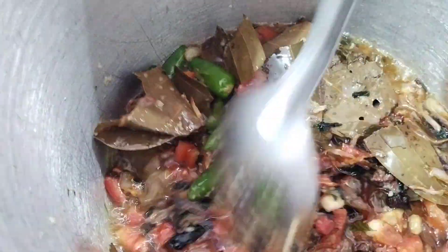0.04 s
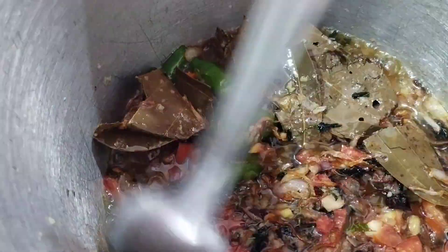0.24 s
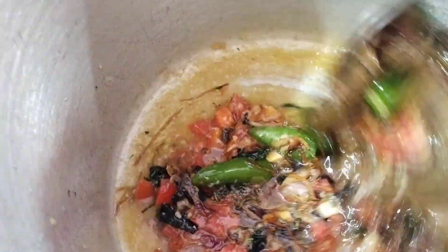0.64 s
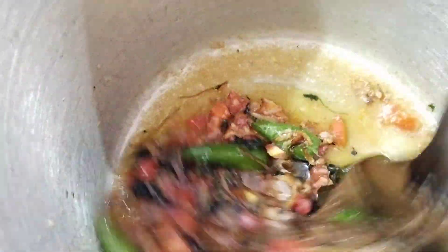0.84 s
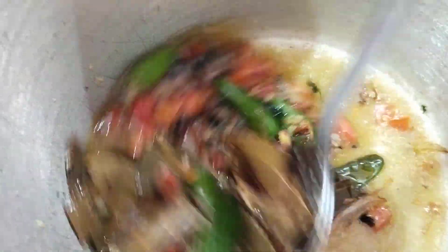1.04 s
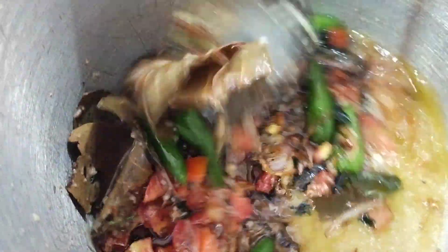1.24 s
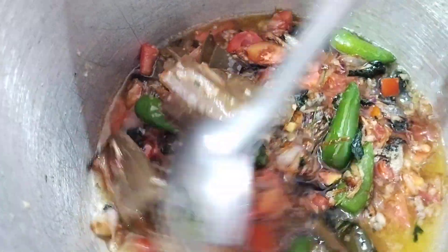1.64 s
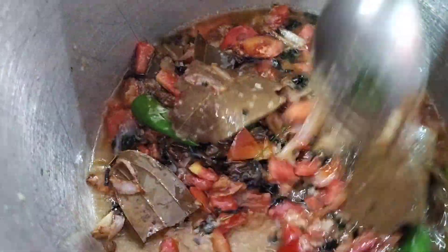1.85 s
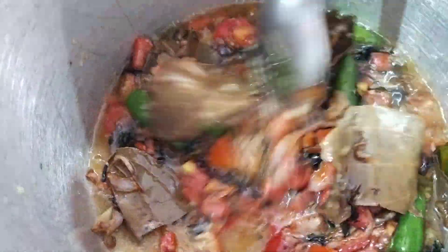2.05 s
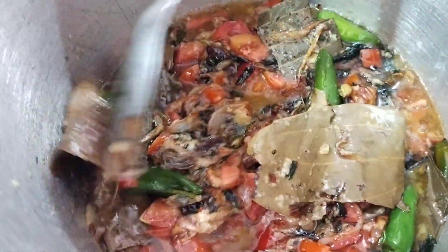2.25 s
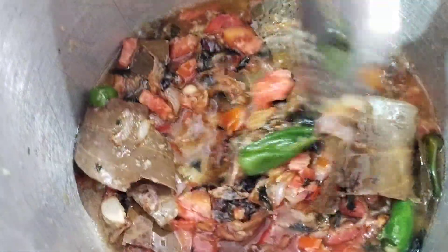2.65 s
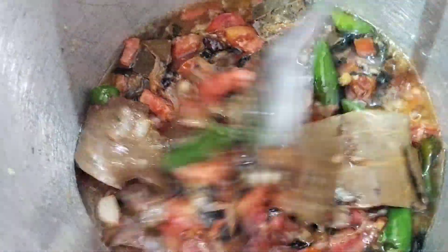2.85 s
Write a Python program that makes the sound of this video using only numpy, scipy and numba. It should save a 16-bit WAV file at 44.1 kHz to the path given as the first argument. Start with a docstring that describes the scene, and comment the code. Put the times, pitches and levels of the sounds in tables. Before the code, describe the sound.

Chopped vegetables sizzle softly in a deep metal pot, heard from just above the rim. A stirring spoon clinks and scrapes, the sizzle flares and dies down, then wet stirring continues with a dull knock.

```python
"""A soft sizzle and a low drone come first: chopped vegetables fry in a deep aluminium pot, heard from
just above the rim, while a metal spoon drags them over the base and drives its modes. The spoon scuffs,
clinks on the wall, scrapes across the base by stick-slip friction and later knocks on it. Where the
scrape bares hot metal the oil flares into a dense sizzle, which dies down as food covers it again.
Churned wet food excites the pot's air resonances, and the pot rocks on its stand."""
import sys
import numpy as np
from scipy import signal
from scipy.fft import rfft, irfft, next_fast_len
from scipy.io import wavfile
from numba import njit

SR = 44100
rng = np.random.default_rng(int(sys.argv[2]) if len(sys.argv) > 2 else 0)


def store_wav(level_fs):
    """Save 16-bit WAV to argv[1]."""
    pcm = np.round(np.clip(np.atleast_2d(level_fs), -1, 1) * 32767)
    wavfile.write(sys.argv[1], SR, pcm.T.astype(np.int16))


N = 127890
TIME = np.arange(N) / SR
IMPULSE = np.r_[1, np.zeros(N - 1)]


def undb(db):
    """Amplitude ratio of a level in decibels."""
    return 10 ** (np.asarray(db) / 20)


def unit(x):
    """Normalisation to rms 1."""
    return x / np.sqrt(np.mean(x ** 2))


def curve(table, column=1):
    """Linear interpolation of one column in time."""
    rows = np.array(table)
    return np.interp(TIME, rows[:, 0], rows[:, column])


def colour(x, spectrum):
    """Minimum-phase filter through (f/Hz, level/dB) points, by folding the cepstrum."""
    size = next_fast_len(N + 8192, real=True)
    hz, db = np.array(spectrum).T
    bin_hz = np.arange(size // 2 + 1) * SR / size
    gain = undb(np.interp(np.log(bin_hz + 1), np.log(hz), db))
    cepstrum = irfft(np.log(gain), size)
    cepstrum[1:size // 2] *= 2
    cepstrum[size // 2 + 1:] = 0
    return irfft(rfft(x, size) * np.exp(rfft(cepstrum)), size)[:N]


@njit
def svf(x, hz, width):
    """State-variable band-pass with a moving centre and unit peak gain."""
    y, band_state, low_state = np.empty(len(x)), 0., 0.
    for i in range(len(x)):
        g, damping = np.tan(np.pi * hz[i] / SR), width / hz[i]
        v = (band_state + g * (x[i] + 1e-18 - low_state)) / (1 + g * (g + damping))
        band_state = 2 * v - band_state
        low_state += 2 * g * v
        y[i] = damping * v
    return y


def band(x, hz, width):
    """Second-order resonance, steady or gliding."""
    return svf(x, hz * np.ones(N), float(width))


def body(x, modes):
    """Forced response: a superposition of resonances."""
    return sum(undb(db) * band(x, hz, width) for hz, width, db in modes)


def clicks(per_s, spread_db):
    """Shot noise: Poisson impulses with exponentially distributed levels."""
    size = undb(spread_db * np.minimum(rng.exponential(size=N), 6))
    occurs = rng.random(N) < per_s / SR
    return unit(occurs * size * rng.choice([-1, 1], N) / np.sqrt(per_s))


def drift(per_s):
    """Random process: Gaussian values joined by straight lines."""
    knots = rng.standard_normal(2048)
    return np.interp(TIME * per_s, np.arange(len(knots)), knots)


def waver(per_s, depth_db):
    """Random modulation factor around 1."""
    return undb(depth_db * drift(per_s))


def fade(t60):
    """Exponential decay by 60 dB in t60 seconds."""
    return np.exp(-np.log(1000) * TIME / t60)


def ring(modes):
    """Free vibration: damped sinusoids of random polarity."""
    return sum(undb(db) * fade(t60) * np.sin(2 * np.pi * (hz * TIME + rng.integers(2) / 2))
               for hz, db, t60 in modes)


def excite(x, response):
    """Convolution with an impulse response scaled to unit energy."""
    return signal.fftconvolve(x, unit(response) / np.sqrt(N))[:N]


def taps(table, column=1):
    """Impulse train: one impulse a row, sized by a level column."""
    x = np.zeros(N)
    for row in table:
        x[int(row[0] * SR)] += undb(row[column])
    return x


def bubbles(low_hz=2580, high_hz=8800, q=23):
    """Bubble resonance: steam bubbles of twelve sizes each ping near their natural frequency."""
    pings = 0
    for hz in np.geomspace(low_hz, high_hz, 12):
        onsets = clicks(per_s=16, spread_db=3.5)
        pings += band(onsets, hz * waver(per_s=60, depth_db=0.17), hz / q) / hz ** 0.23
    return unit(pings)


# sizzle of the oil, louder where it is hotter: t/s, level/dB
HEAT = [(0, -43.5), (.2, -49), (.33, -53), (.42, -50), (.52, -51.5), (.61, -36), (.9, -31.5), (1.12, -30.5),
        (1.3, -33), (1.5, -41), (1.6, -46.5), (1.8, -45.5), (1.92, -43), (2.05, -46), (2.25, -48),
        (2.9, -48.5)]
# spectra of oil pops, larger droplets and fine spray: f/Hz, level/dB
POP_SPECTRUM = [(50, -27), (350, -27.5), (560, -16), (760, -13.5), (950, 1), (1200, -2), (1450, 0),
                (1750, -5), (2300, 0.5), (4000, -2), (5400, -3.5), (6800, -5.5), (8800, -10.5),
                (11000, -16.5), (15000, -28)]
SPIT_SPECTRUM = [(300, -40), (2000, -5), (5000, -12), (9000, 7), (15000, -19)]
FIZZ_SPECTRUM = [(1000, -47), (6000, -5), (9000, 7.5), (12000, -3), (15000, -5)]
# single droplets that burst loudly: t/s, level/dB
DROPLETS = [(1.704, -20), (1.935, -21), (1.942, -13)]


def sizzle(hot_db=-31, hot_pops_per_s=14000):
    """Shot noise of steam bursts: hotter oil pops more densely, fizzes more and drowns single pings."""
    heat = curve(HEAT)
    pops_per_s = hot_pops_per_s * undb(0.8 * (heat - hot_db))
    pops = unit(colour(clicks(pops_per_s, spread_db=2.5), POP_SPECTRUM))
    spits = undb(-14.5) * unit(colour(clicks(per_s=470, spread_db=-2.5), SPIT_SPECTRUM))
    spray = unit(colour(clicks(per_s=13000, spread_db=1.5), FIZZ_SPECTRUM))
    fizz = undb(-11.5 + heat - hot_db) * spray
    pings = undb(-8 - 0.23 * (heat - heat.min())) * bubbles()
    oil = (pops + spits + fizz + pings) * undb(heat) * waver(per_s=40, depth_db=0.33)
    return oil + colour(taps(DROPLETS), SPIT_SPECTRUM)


# drag of spoon and food over the base: t/s, level/dB
DRAG = [(0, -44.5), (.23, -41.5), (.295, -43), (.315, -74), (.4, -62), (.445, -40.5), (.59, -43),
        (.78, -42), (.88, -51), (1.18, -48), (1.27, -48), (1.6, -38.5), (1.83, -42.5), (2.13, -41),
        (2.2, -35), (2.38, -41), (2.61, -38.5), (2.76, -44.5), (2.9, -43)]
# spectrum of the friction force: f/Hz, level/dB
JUDDER_SPECTRUM = [(30, -54), (90, -2), (190, -19), (310, -3), (550, -3), (760, -11), (3000, -33)]
# modes of the loaded base: f/Hz, bandwidth/Hz, level/dB
BASE_MODES = [(92, 120, -21), (252, 12, -4), (345.6, 32.6, 3.5), (383, 98, -1), (587, 72, -12.5)]


def drone():
    """Forced vibration: dragged food judders and drives the modes of the base."""
    judder = colour(clicks(per_s=1400, spread_db=0), JUDDER_SPECTRUM)
    return unit(body(judder, BASE_MODES)) * undb(curve(DRAG))


# the pot's air resonances, shifting as food is pushed about: t/s, lower f/Hz, upper f/Hz
AIR_MODES = [(0, 986, 1580), (.56, 1030, 1480), (.66, 997, 1490), (.85, 947, 1434), (1.15, 980, 1410),
             (1.5, 1006, 1510), (1.8, 1023, 1515), (2.35, 1009, 1562), (2.9, 1052, 1630)]
# churning in each resonance: t/s, lower level/dB, upper level/dB
CHURN = [(0, -55, -55.5), (.27, -55.5, -55), (.33, -92, -92), (.41, -62, -59), (.46, -48, -48),
         (.57, -57, -52), (.61, -51, -53), (.66, -40, -41), (.79, -34.5, -37.5), (.87, -42.5, -43),
         (.93, -40, -76), (1.3, -46, -44), (1.48, -53, -48), (1.55, -45.5, -43), (1.7, -45, -45.5),
         (1.79, -49, -41), (1.97, -48, -46), (2.12, -45.5, -54), (2.2, -45.5, -45), (2.37, -45, -44),
         (2.44, -53, -54), (2.5, -52, -45), (2.59, -45, -44), (2.74, -50.5, -58.5), (2.9, -59, -49.5)]
# spectrum of wet food: f/Hz, level/dB
SQUELCH_SPECTRUM = [(100, -38), (750, -12), (1200, 8.5), (2100, 5), (4500, -37), (12000, -26)]


def churning(widths_hz=(92, 232)):
    """Cavity resonance: wet food squelches and excites two modes of the air in the pot."""
    wet = clicks(per_s=1500, spread_db=2.24)
    out = unit(colour(wet, SQUELCH_SPECTRUM)) * undb(curve(CHURN, column=2) - 8.5)
    for column, width in enumerate(widths_hz, start=1):
        hz = curve(AIR_MODES, column)
        resonance = unit(band(band(wet, hz, width), hz, width))
        out += resonance * undb(curve(CHURN, column))
    return out


# scuffs, squeaks and grunts of the spoon's edge: centre t/s, duration/s, f/Hz, bandwidth/Hz, level/dB
SCUFFS = [(0, 0.16, 3200, 400, -44), (0.09, 0.018, 4280, 400, -42), (0.157, 0.019, 5040, 402, -42.5),
          (0.196, 0.056, 5040, 432, -48), (0.246, 0.022, 4000, 300, -44.5), (.45, 0.066, 1930, 60, -39),
          (.451, 0.0075, 450, 108, -36.5), (0.532, 0.035, 1496, 39.8, -37), (0.617, 0.064, 5700, 2210, -30),
          (.677, 0.051, 3650, 900, -27.5), (0.827, 0.022, 2370, 330, -20.5),
          (.848, 0.0046, 2920, 1800, -19.5), (.869, .014, 3400, 900, -29.5), (0.867, 0.023, 7200, 900, -32),
          (1.42, 0.15, 4170, 900, -40.5), (1.53, 0.044, 3160, 700, -41), (1.783, 0.044, 1522, 70, -38.5),
          (2.03, .066, 6160, 400, -49), (2.299, 0.03, 2960, 260, -43), (2.373, 0.0048, 1670, 258, -38),
          (2.495, 0.0079, 1760, 500, -34.5), (2.496, 0.017, 4800, 3000, -44.5),
          (2.563, .0054, 3140, 260, -38), (2.661, 0.027, 5160, 700, -46.5),
          (2.765, 0.031, 8400, 1500, -51.5), (2.707, 0.045, 2280, 450, -45), (2.8, 0.0084, 2580, 500, -39)]


def scuffs():
    """Friction noise: each brief contact excites a narrow band under a Gaussian envelope."""
    grit = clicks(per_s=2500, spread_db=1.5)
    out = np.zeros(N)
    for centre, duration, hz, width, db in SCUFFS:
        envelope = undb(db) * np.exp(-2 * ((TIME - centre) / duration) ** 2)
        out += unit(band(band(grit, hz, width), hz, 2 * width)) * envelope
    return out


# bass spectrum of the handling rumble and of the bumps: f/Hz, level/dB
BASS_SPECTRUM = [(20, -30), (55, -14.5), (90, -3), (130, -4.5), (220, -12.5), (1000, -87)]


def rumble():
    """Uncorrelated noise: low handling rumble, separate in each channel, swelling with the drag."""
    noise = unit(colour(rng.standard_normal(N), BASS_SPECTRUM))
    return undb(curve(DRAG) - 27.5) * noise * waver(per_s=9.4, depth_db=-0.5)


# spectrum of the quiet kitchen: f/Hz, level/dB
KITCHEN_SPECTRUM = [(25, -56), (55, 8), (90, 5.5), (180, 12), (400, -38.5), (1000, -53), (5000, 1),
                    (15000, -43)]


def kitchen():
    """Stationary background noise: a low murmur and a faint hiss."""
    return undb(-65.5) * unit(colour(rng.standard_normal(N), KITCHEN_SPECTRUM))


# the pot rocks on its stand: t/s, level/dB
BUMPS = [(.095, -31), (.197, -25), (.298, -15.5), (.387, -23), (.545, -22.5), (1.03, -21.5), (1.9, -44),
         (2.5, -35), (2.6, -27)]


def bumps():
    """Heavily damped impact: each rock of the pot gives one low pulse."""
    return excite(taps(BUMPS), colour(IMPULSE, BASS_SPECTRUM))


# blows of the spoon: t/s, crack level/dB, ring level/dB, thud level/dB
BLOWS = [(.2993, 3, -4.5, -38), (.3045, -18, -18, -54), (.391, -13.5, -21, -41), (.446, -18, -36, -10.5),
         (.508, -7, -14, -45), (.5215, -18, -11, -40), (.848, -24, -2, -21), (2.147, -8.5, -19, 3.5),
         (2.16, -19, -21, -4.5), (2.4916, -18, -36, -38), (2.498, -16.5, -30, -32), (2.563, -30, -28, -32),
         (2.7894, -28, -18.5, -28)]
# spectra of the first instant of contact, the crack and the thud: f/Hz, level/dB
SNAP_SPECTRUM = [(100, -56), (1500, -19), (3800, -10.5), (7000, 2), (15000, -10)]
CRACK_SPECTRUM = [(100, -35), (400, 2), (750, -16), (1450, -6.5), (2200, 0.5), (3500, 6.5), (5200, 0.5),
                  (7000, -2.5), (9000, -14), (15000, -29)]
THUD_SPECTRUM = [(60, -25), (150, -8.5), (230, -3), (335, 0), (480, -11), (700, -12), (950, -6.5),
                 (1500, -9.5), (2200, -63), (6000, -38), (15000, -29)]
# modes of spoon and wall: f/Hz, level/dB, T60/s
METAL_MODES = [(1175, -20, .13), (1965, 3, 0.097), (2194, -1.5, 0.47), (2310, -3, 0.053),
               (2362, -8.5, 0.25), (2970, -7, 0.13), (3210, 1.5, 0.13), (3624, 3, .13), (3860, -4, 0.074),
               (4400, -9, 0.11), (4900, -14, 0.11), (5400, -7.5, 0.11), (6724, -3.5, 0.15)]


def blows():
    """Impact excitation: a blow cracks, rings the metal with a dense shimmer and thuds the base."""
    crack_decay = fade(t60=0.0088) + undb(-29.5) * fade(t60=0.42)  # the slow term is the shimmer
    snap = undb(-4.5) * colour(IMPULSE, SNAP_SPECTRUM)
    crack = snap + colour(rng.standard_normal(N) * crack_decay, CRACK_SPECTRUM)
    thud_decay = undb(-73) * fade(t60=0.074) + undb(-34.5) * fade(t60=0.61)
    push = IMPULSE + rng.standard_normal(N) * thud_decay
    thud = colour(push + undb(6.5) * body(push, BASE_MODES), THUD_SPECTRUM)
    return sum(excite(taps(BLOWS, column), response)
               for column, response in enumerate((crack, ring(METAL_MODES), thud), start=1))


# the long scrape over bare metal: t/s, level/dB, contact resonance f/Hz
SCRAPE = [(.378, -46, 2760), (.393, -35, 2890), (.48, -30, 5130), (.52, -30, 4800), (.56, -27, 5060),
          (.6, -27, 4560), (.645, -28.5, 4240), (.68, -24.5, 3330), (.74, -28, 3740), (.8, -25.5, 3100),
          (.85, -31.5, 2980), (.875, -27.5, 3050), (.89, -66, 3280)]
# spectrum of the slips: f/Hz, level/dB
SLIP_SPECTRUM = [(100, -42), (800, -40), (1900, -26), (2300, 4.5), (2900, -4.5), (3800, -0.5), (5000, -2.5),
                 (7500, -4), (10000, -11.5), (15000, -30)]


def scraping(contact_width_hz=1900):
    """Stick-slip friction: the contact resonance moves as the spoon turns, and the wall rings along."""
    slips = colour(clicks(per_s=2100, spread_db=2), SLIP_SPECTRUM) * waver(per_s=250, depth_db=1.0)
    contact = unit(band(slips, curve(SCRAPE, column=2), contact_width_hz))
    edge = unit(contact + undb(-1.5) * unit(slips)) * undb(curve(SCRAPE))
    return edge + undb(-15.5) * excite(edge, ring(METAL_MODES))


def reflections(x, paths=4, above_hz=760):
    """Time-varying reverberation: short echoes in the pot keep changing as spoon and food move."""
    treble = signal.sosfilt(signal.butter(2, above_hz, "high", fs=SR, output="sos"), x)
    shares = np.array([drift(per_s=12) for _ in range(paths)])
    echoes = np.array([excite(treble, rng.standard_normal(N) * fade(t60=0.039)) for _ in range(paths)])
    return (shares * echoes).sum(axis=0) / np.sqrt((shares ** 2).sum(axis=0))


# left channel relative to right: f/Hz, level/dB
BALANCE = [(70, 1.5), (180, -2), (350, -3.2), (1200, -3.3), (2400, -4.5), (5000, -2.8), (9000, -5.8),
           (14000, -7.5)]


def pan(x, side):
    """Interchannel level difference: the pot lies a little to the right, most of all in the treble."""
    hz, db = np.array(BALANCE).T
    difference_db = np.interp(np.arange(N // 2 + 1) * SR / N, hz, db)
    return irfft(rfft(x) * undb(side / 2 * difference_db), N)


# response of the direct path out of the pot: f/Hz, level/dB
DIRECT_PATH = [(450, 0), (1000, -4), (2500, -6), (6000, -10)]


def scene(left_lag_s=0.00023):
    """Superposition of direct and reflected sound at two points; the direct sound is later on the left."""
    frying = sizzle() + drone() + churning() + scraping() + scuffs()
    impacts = bumps() + blows()
    direct = colour(frying, DIRECT_PATH) + impacts
    channels = []
    for side, lag in ((1, int(left_lag_s * SR)), (-1.05, 0)):
        delayed = np.r_[np.zeros(lag), direct][:N]
        reflected = undb(0.5) * reflections(frying + undb(2.5) * impacts)
        channels.append(pan(delayed + reflected, side) + rumble() + kitchen())
    return np.array(channels)


def record(dry):
    """Band limiting: a steep elliptic low-pass removes the treble above 15250 Hz."""
    return signal.sosfilt(signal.ellip(10, .2, 80, 15250, fs=SR, output="sos"), dry)


dry = scene()
out = record(dry)
store_wav(out)
```